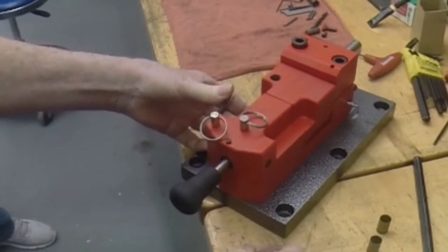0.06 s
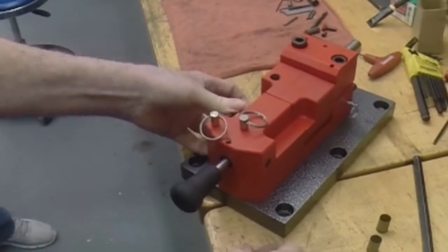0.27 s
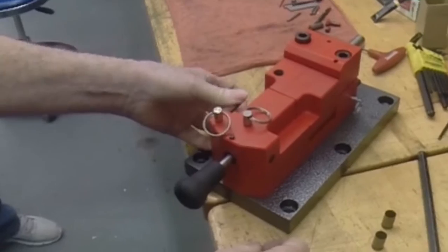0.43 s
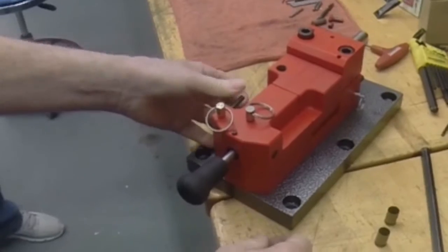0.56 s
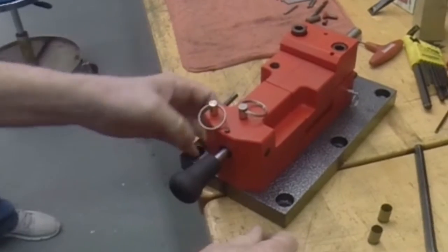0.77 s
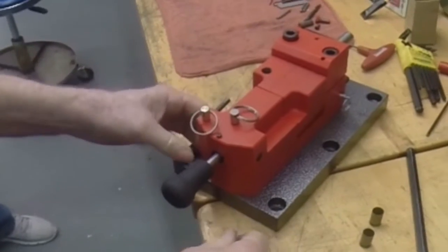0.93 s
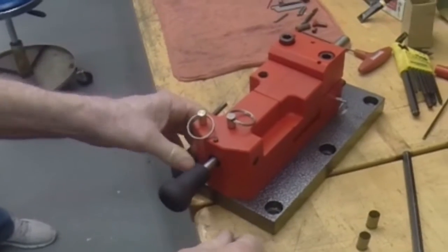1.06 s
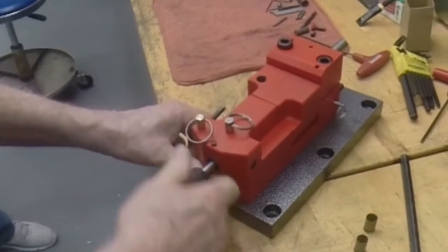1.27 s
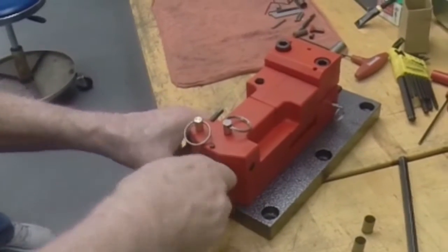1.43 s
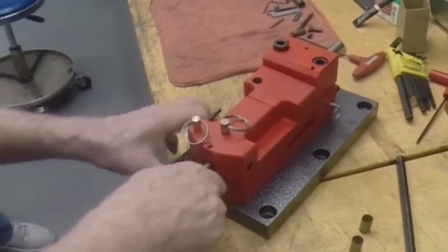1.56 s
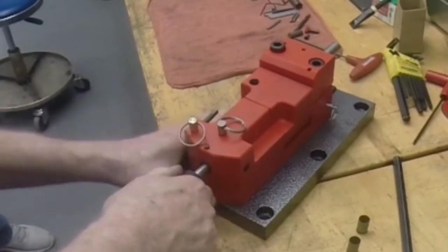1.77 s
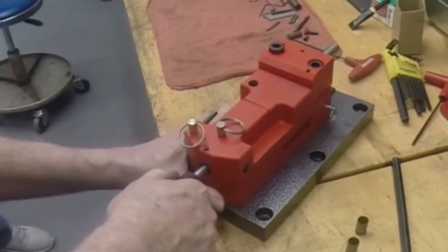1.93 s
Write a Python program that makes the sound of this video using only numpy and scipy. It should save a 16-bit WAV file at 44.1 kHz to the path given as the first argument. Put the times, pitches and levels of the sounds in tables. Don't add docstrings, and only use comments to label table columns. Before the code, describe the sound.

Loud primer pop, like a small gunshot, after faint metal ticks, echoing across a workshop

```python
import sys
import numpy as np
from scipy import signal
from scipy.fft import rfft, irfft, next_fast_len
from scipy.io import wavfile
from scipy.ndimage import map_coordinates

SR = 44100
rng = np.random.default_rng(int(sys.argv[2]) if len(sys.argv) > 2 else 0)


def unload_wav(signal):
    wavfile.write(
        sys.argv[1],
        SR,
        np.round(np.clip(np.atleast_2d(signal).T, -1, 1) * 32767).astype(np.int16),
    )


def volts(x):
    e = np.asarray(x, float) / 20
    return 10 ** e


N = 88200
POP_S = 0.2147


def unit(x):
    return x / np.sqrt(np.mean(x ** 2) + 1e-20)


def along(points, hz):
    f, v = np.transpose(points)
    return np.interp(np.log(hz + 1), np.log(f + 1), v)


def wobble(rate):
    knots = rng.standard_normal(int(N * 40 / SR) + 4)
    return map_coordinates(knots, [np.arange(N) * rate / SR])


def filtered(x, response):
    m = next_fast_len(len(x) + 8192)
    return irfft(rfft(x, m) * response(np.fft.rfftfreq(m, 1 / SR)), m)[:len(x)]


def hiss(spectrum, size):
    return unit(filtered(rng.standard_normal(size), lambda hz: volts(along(spectrum, hz))))


def placed(x, start_s):
    return np.pad(x, (round(start_s * SR), N))[:N]


def pop():
    pulse_db, pulse_s = 16, 0.00013
    blast_db, blast_t60_s, echo_gas_db = 15.5, 0.025, -12.5
    # pitch_hz [Hz], level_db [dB per Hz]
    burst = [(30, -15.5), (100, -7.5), (600, 2), (1200, 10), (3000, -1), (5000, 1), (8000, -18.5),
             (15500, -28)]
    # pitch_hz [Hz], level_db [dB], t60_s [s]
    bench = [(70, 6.5, .05), (180, 7.5, 0.016), (282, 11.5, 0.045), (357, 4.5, .04)]
    # delay_s [s], level_db [dB], polarity [sign]
    walls = [
        (.0029, -4.5, 1),
        (.0049, -10.5, 1.5),
        (.0089, 3.5, -1),
        (.0125, 5.5, -1),
        (0.0147, 11, -1),
        (.019, 3.5, -1),
        (.0243, 3, -1),
    ]
    t = np.arange(SR // 10) / SR
    u = t / pulse_s
    pulse = -volts(pulse_db) * 0.5 * u ** 2 * (3 - u) * np.exp(-u)

    def gas():
        swell = 1 - np.exp(-t / 0.00059)
        return volts(blast_db - 60 * t / blast_t60_s) * hiss(burst, len(t)) * swell

    thump = sum(volts(db - 60 * t / t60) * np.sin(2 * np.pi * hz * t) for hz, db, t60 in bench)
    thump = thump * (1 - np.exp(-(t / 0.0012) ** 2))
    out = placed(pulse + gas() - thump, POP_S)
    for delay_s, db, polarity in walls:
        slap = np.sign(polarity) * 1.2 * pulse + volts(echo_gas_db) * gas()
        out += placed(volts(db) * slap, POP_S + delay_s)
    return out


def hall():
    level_db, rise_s = 20.5, 0.0056
    # pitch_hz [Hz], level_db [dB per Hz]
    colour = [(110, -28), (170, -30.5), (215, -9), (700, -6), (1660, -11), (3000, -9.5), (5400, -13),
              (12300, -34), (15500, -59)]
    # pitch_hz [Hz], t60_s [s]
    decay = [(100, .5), (250, 0.74), (700, 0.88), (1500, 0.94), (3000, .75), (6000, 0.76), (10000, 0.62),
             (15000, .35)]
    # pitch_hz [Hz], width_hz [Hz], lift_db [dB]
    fixture = [(694, 220, 3), (1025, 400, 6), (1970, 200, 5), (3070, 750, 6.5), (4570, 300, 4),
               (5530, 1200, 3)]
    # pitch_hz [Hz], width_hz [Hz], level_db [dB], t60_s [s]
    bays = [(1020, 400, -13.5, 1.6), (4500, 2500, -6, 1.07), (259, 80, 0, 0.76), (12057, 2500, -13, .42)]
    # pitch_hz [Hz], level_db [dB], t60_s [s]
    boom = [(103.7, -8.5, .5), (56, -13, .5), (179, -6, 0.46)]
    t = np.arange(N) / SR

    def fixture_gain(hz):
        return volts(sum(db / (1 + (2 * (hz - centre) / width) ** 2) for centre, width, db in fixture))

    excited = unit(filtered(hiss(colour, N), fixture_gain))
    hz, s, z = signal.stft(excited, SR, nperseg=512)
    fade = volts(-60 * s / along(decay, hz)[:, None])
    tail = volts(level_db) * signal.istft(z * fade, SR, nperseg=512)[1][:N]
    modes = [(hz, 20, db, t60) for hz, db, t60 in boom]
    for centre, width, db, t60 in list(bays) + modes:
        noise = rng.standard_normal(N)
        band = unit(filtered(noise, lambda f: 1 / (1 + (2 * (f - centre) / width) ** 4)))
        tail = tail + band * volts(db - 60 * t / t60)
    return placed(tail * (1 - np.exp(-t / rise_s)), POP_S)


def ticks():
    # start_s [s], level_db [dB], t60_s [s]
    contacts = [
        (0.1843, -61.5, 0.09),
        (.189, -61, 0.06),
        (.198, -52, 0.0051),
        (.206, -54, 0.014),
        (0.213, -46.5, .02),
        (1.594, -46.5, .008),
        (1.596, -52, 0.029),
        (1.604, -50, 0.03),
        (1.619, -66, 0.007),
    ]
    # pitch_hz [Hz], level_db [dB]
    steel = [(2100, -1.5), (3000, 2.5), (3500, -2.5), (4700, -3.5), (5400, 0.5), (6400, -12)]
    crack = [(700, -21), (2000, 3), (6000, -1.5), (7500, -14.5), (14000, -34.5)]  # (Hz, dB per Hz)
    out = np.zeros(N)
    t = np.arange(SR // 10) / SR
    for start_s, db, t60 in contacts:
        ring = 0
        for hz, level in steel:
            strength, detune, phase = rng.standard_normal(3)
            tone = np.sin(2 * np.pi * hz * (1 + 0.02 * detune) * t + 2 * phase)
            ring = ring + volts(level + 3 * strength) * tone
        rough = 1.2 * hiss(crack, len(t))
        out += placed(volts(db - 4 - 60 * t / t60) * (0.7 * ring + rough), start_s)
    return out


def machinery():
    motor_on_s, motor_lift_db = 1.43, 6
    drift_hz, flutter_rate = 2.5, 14
    # pitch_hz [Hz], level_db [dB], unsteady_db [dB]
    lines = [(62.6, -47.5, 4.5), (118.4, -51, 2), (178, -73.5, 4)]
    t = np.arange(N) / SR
    motor_off = 1 / (1 + np.exp((t - motor_on_s) / 0.029))
    out = np.zeros(N)
    for hz, db, unsteady_db in lines:
        lift_db = motor_lift_db * (1 if hz > 100 else 0.5)
        level = volts(db + unsteady_db * wobble(flutter_rate) - lift_db * motor_off)
        cycles = np.cumsum(hz + drift_hz * wobble(flutter_rate)) / SR
        out += np.sqrt(2) * level * np.sin(2 * np.pi * cycles)
    return out


def insect():
    pitch_hz, width_hz, level_db, pulses_hz = 10100, 200, -83, 47.97
    t = np.arange(N) / SR
    cycles = np.cumsum(pitch_hz + 0.3 * width_hz * wobble(39)) / SR
    tone = np.sqrt(2) * np.sin(2 * np.pi * cycles)
    beat = np.clip(np.cos(2 * np.pi * pulses_hz * t) + 0.1, 0, None)
    return volts(level_db + 3.5 + 2.2 * wobble(23)) * beat * tone


def room_tone():
    air_db, rumble_db = -54.5, -50
    # pitch_hz [Hz], level_db [dB per Hz]
    air_colour = [(90, -30), (150, -5.5), (500, -10.5), (900, -10.5), (1500, -21), (5000, -28),
                  (8000, -37.5), (12000, -42), (15500, -55.5)]
    # pitch_hz [Hz], level_db [dB per Hz]
    rumble_colour = [(20, -16), (32, 2.5), (50, 0), (90, 4), (130, -6.5), (170, -15.5)]
    skirted = [(10, -64.5)] + list(rumble_colour) + [(260, -54.5)]
    air = volts(air_db + 0.8 * wobble(7)) * hiss(air_colour, N)
    rumble = volts(rumble_db + 2.5 * wobble(13)) * hiss(skirted, N)
    return air + rumble


def scene():
    return (pop() + hall() + ticks() + machinery() + insect() + room_tone())[None]


def band_limit(x):
    return signal.sosfilt(signal.butter(12, 15700, fs=SR, output="sos"), x)


def record(dry):
    clip_top, clip_hardness, roll_hz = 0.96, 5, 15300
    # time_s [s], gain_db [dB]
    gain = [
        (0, -1),
        (0.214, 0.5),
        (.221, -30.5),
        (0.241, -37.5),
        (.4, -27.5),
        (0.618, -12),
        (.9, -8.5),
        (1.201, -2.5),
        (1.5, 1),
        (2, 2),
    ]
    s, db = np.transpose(gain)
    x = dry * volts(np.interp(np.arange(N) / SR, s, db))
    x = x / (1 + np.abs(x / clip_top) ** clip_hardness) ** (1 / clip_hardness)
    x = filtered(x[0], lambda hz: 1 / (1 + (hz / roll_hz) ** 12))[None]
    return band_limit(x)


dry = scene()
out = record(dry)
unload_wav(out)
```